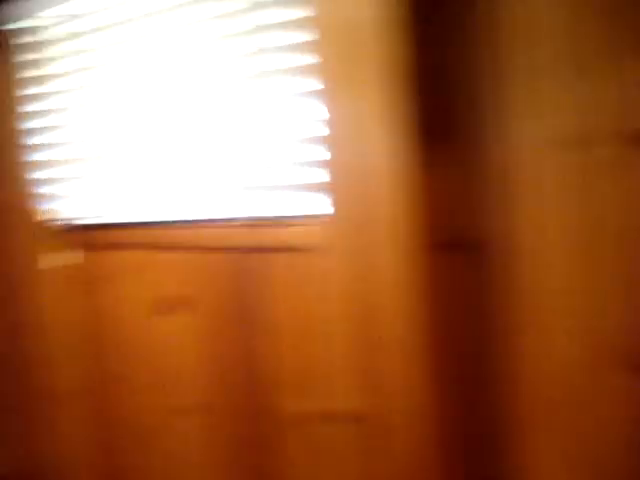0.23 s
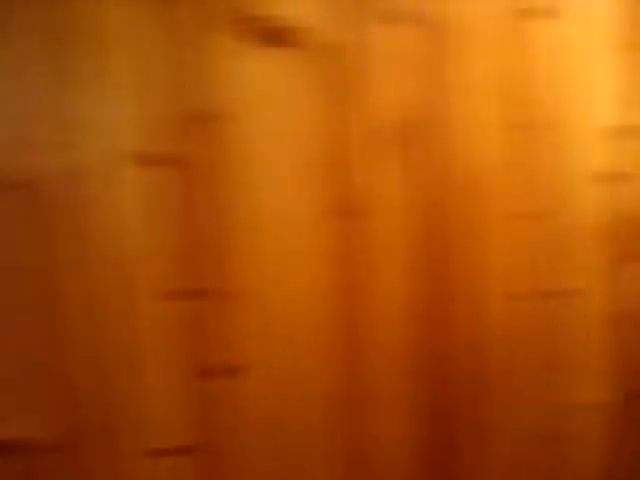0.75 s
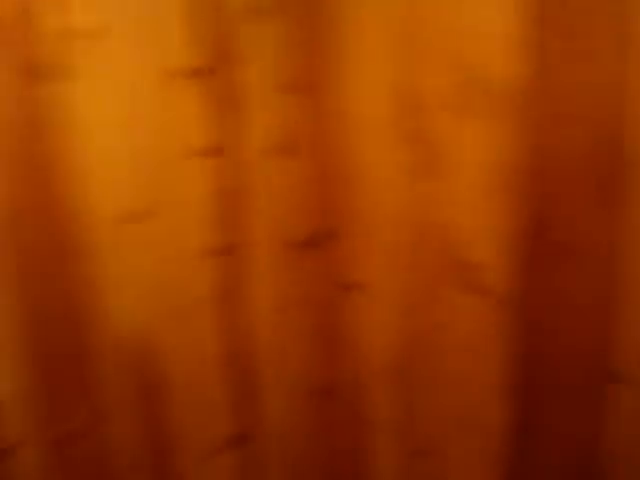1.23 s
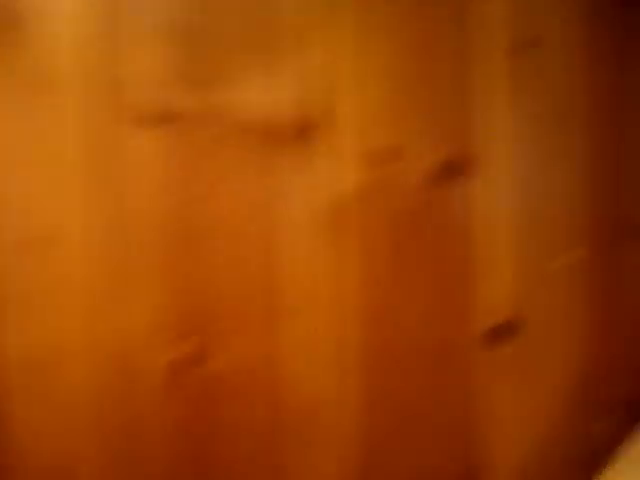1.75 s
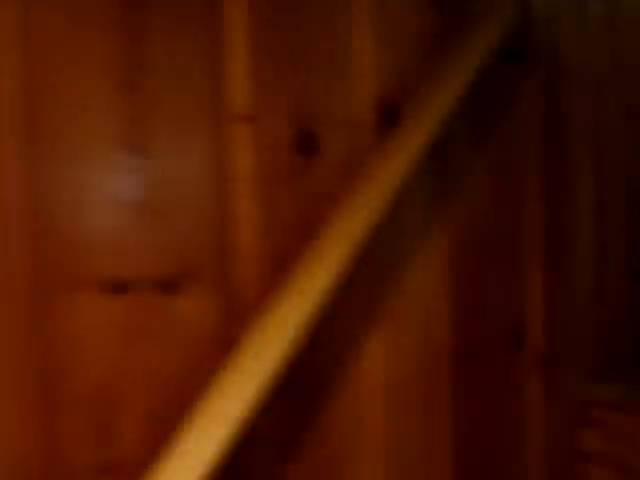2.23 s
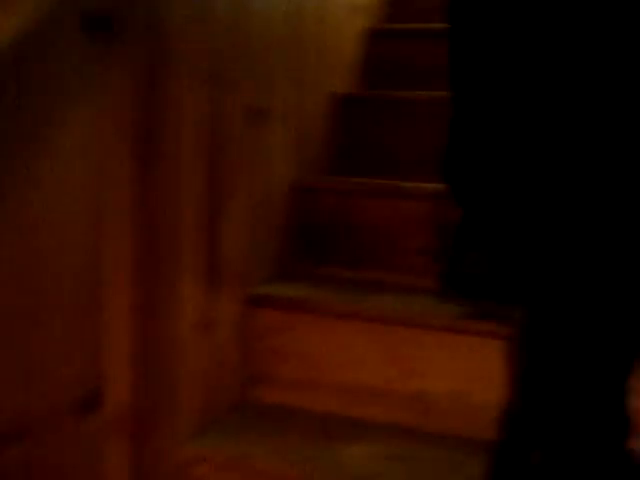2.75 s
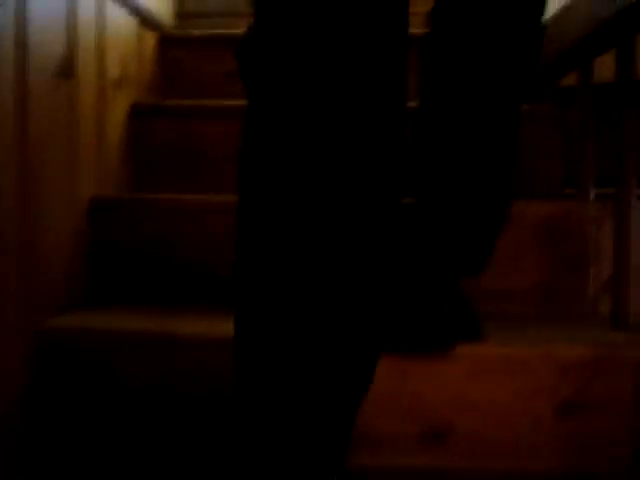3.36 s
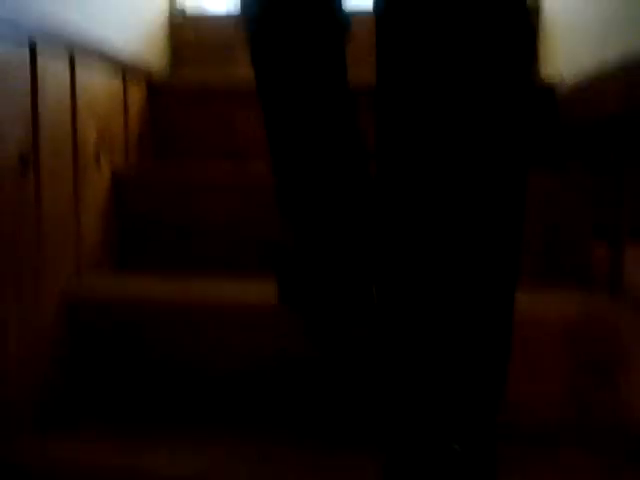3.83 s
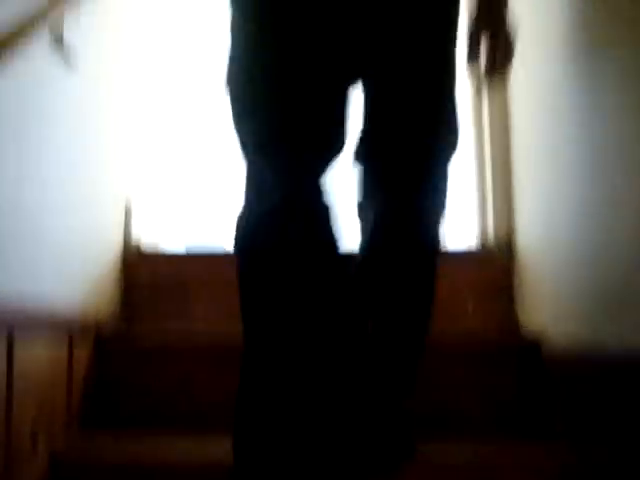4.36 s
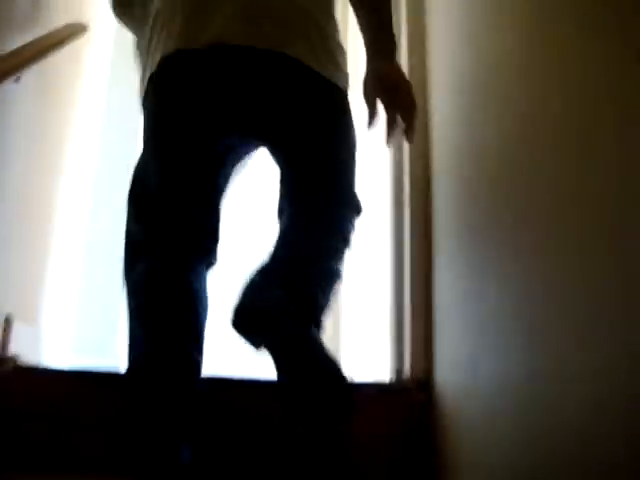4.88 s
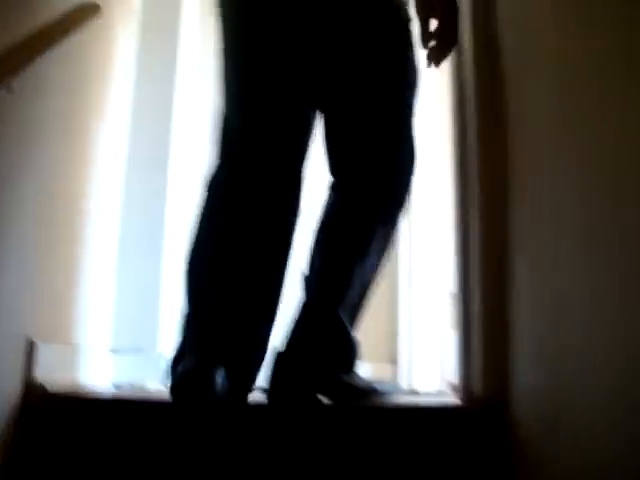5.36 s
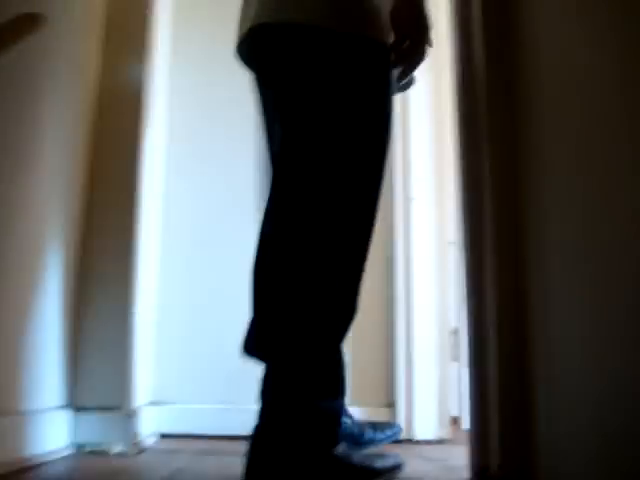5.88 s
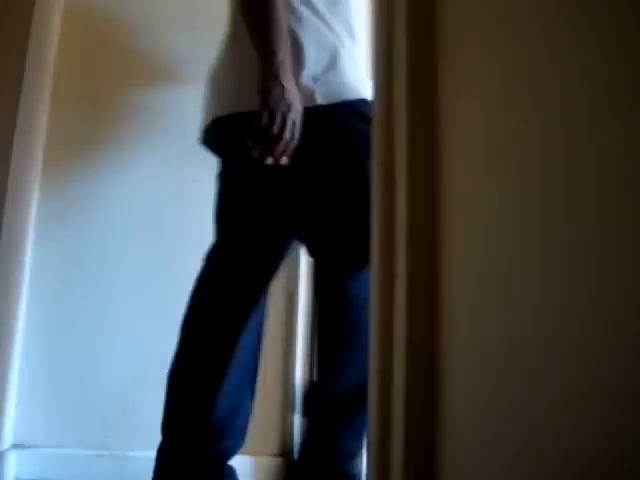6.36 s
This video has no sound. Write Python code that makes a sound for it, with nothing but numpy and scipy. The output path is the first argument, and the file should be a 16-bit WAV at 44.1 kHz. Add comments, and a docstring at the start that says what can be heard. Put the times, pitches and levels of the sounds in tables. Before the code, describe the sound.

In a quiet house, someone in hard shoes walks to a wooden staircase and goes up at about two steps a second, a few landing close together. The boards knock and ring briefly, and the bare walls echo. The microphone follows as the soles scrape grittily on the top landing, where a few lighter, more echoing steps move away.

```python
"""In a wood-panelled room, hard-soled shoes cross the floor and climb a wooden staircase.
The microphone follows behind. Each blow cracks on a board, rings it and shakes the stair frame,
and the bare walls answer with a dense echo. Boards knock again as the weight shifts, and the
soles scuff, most of all on the top landing. Under it all lies the faint noise of a quiet house."""
import sys
import numpy as np
from scipy import signal
from scipy.fft import rfft, irfft
from scipy.io import wavfile
from scipy.ndimage import uniform_filter1d

SR = 44100
rng = np.random.default_rng(int(sys.argv[2]) if len(sys.argv) > 2 else 0)


def bounce(signal):
    """Save signal as a 16-bit WAV file at the path given by the first command-line argument."""
    frames = np.transpose(np.atleast_2d(signal))
    limited = np.clip(frames, -1, 1)
    pcm = np.round(limited * 32767).astype(np.int16)
    wavfile.write(sys.argv[1], SR, pcm)


N = 291426

# The steps. Each row: start in seconds, strength in dB, weight on the stair frame in dB,
# hardness in dB (plus on the heel's edge, minus when flat), board pitch in Hz, heel pitch in Hz.
STEPS = [(0.1295, -11.5, -25, -1.5, 689, 1654), (0.7457, -11.5, -27, 1, 710, 1237),
         (1.3072, -12, -26, -1.5, 735.4, 860), (1.8172, -12, -21, 0.5, 619.6, 895),
         (2.164, -13.5, -25.5, -3, 470, 1360), (2.5263, -14, -33.5, 1, 804, 1304),
         (2.8138, -16.8, -20, -1.5, 677, 967), (2.9495, -10.5, -30.5, 0.5, 737, 1310),
         (3.3522, -18, -51.5, -1.5, 828, 1510), (3.4308, -12, -30, 3.5, 626, 1193),
         (3.9501, -11.5, -25, -2.5, 528.7, 1106), (4.413, -11.5, -32.5, 3.5, 762, 1297),
         (4.8074, -12.5, -30, 0, 735.5, 975), (5.2522, -17, -38, 2.5, 735, 1490),
         (5.7555, -27.5, -26, -5.5, 469, 1064), (6.0029, -22, -25, -1.5, 657, 894),
         (6.4398, -16, -23.5, -4.5, 525, 1031)]
# Toe taps and boards taking weight. Each row: start in seconds, strength in dB, hardness in dB.
TAPS = [(.584, -43.5, -11.5), (0.63, -35, -5), (.950, -23.5, -3.5), (1.348, -23.5, -1), (1.374, -27.5, -4),
        (1.465, -26, -1), (1.754, -30.5, -6), (1.985, -28.5, 0), (2.110, -26.5, -3.5), (2.122, -30, -2.5),
        (2.505, -28, -7), (3.520, -31, -13.5), (3.622, -24, -2), (4.158, -24, -5), (4.289, -31, -0.5),
        (4.695, -37, 6), (4.743, -24, 1), (5.659, -34, 0), (5.791, -30.5, -2.5), (5.861, -32.5, -6.5),
        (6.084, -30, -4.5)]
# Soles sliding on wood. Each row: start in seconds, length in seconds, level in dB.
SCUFFS = [(1.937, 0.042, -33), (2.306, 0.059, -39), (4.76, 0.054, -30.5), (4.867, 0.17, -30),
          (5.15, 0.13, -28.5), (5.259, 0.059, -27), (5.353, 0.082, -28.5), (6.047, 0.14, -34.5),
          (6.536, 0.062, -32)]
# The tone of struck wood, a sliding sole and the house. Each row: frequency in Hz, gain in dB.
WOOD_TONE = [(30, -42), (60, -18.5), (120, -9.5), (190, -3.5), (400, 5), (750, 7), (1600, 5.5), (2500, -6),
             (4000, -11.5), (6000, -14.5), (10000, -28.5)]
RASP_TONE = [(60, -26), (200, -19.5), (450, -0.5), (1000, -1), (2200, -4.5), (3200, -8.5), (4300, -10),
             (6500, -19), (10000, -34.5)]
HOUSE_TONE = [(30, -20.5), (100, -13.5), (250, -2), (500, -3), (1000, -1), (2000, -6.5), (4000, -12),
              (6500, -16), (10000, -19.5)]
# The notes of a board and of the stair frame under it.
# Each row: multiple of its pitch, level in dB, t60 (the seconds it takes to fade by 60 dB).
BOARD_NOTES = [(0.801, -7.5, 0.2), (1, 0, 0.55), (1.421, -21, 0.42), (2.098, -6.5, 0.22),
               (3.299, -13, 0.24)]
FRAME_NOTES = [(0.657, -11.5, 0.17), (0.999, -6, 0.35), (1.327, -9, 0.4)]
# The five bands of a blow: thud, body, knock, crack, tick. Each row: low and high edge in Hz,
# gain in dB, clatter t60 in seconds, echo t60 in seconds, echo level in dB.
BLOW_BANDS = [(45, 317, -5, 0.38, 0.64, -2.5), (322, 812, -4.5, 0.24, 0.83, -2),
              (1000, 2115, -4, 0.13, 0.72, -6.5), (2110, 5730, -7, 0.11, 0.69, -8.5),
              (4750, 13000, -0.5, 0.12, 0.73, -8.5)]
# The heel's body, knock, crack and tick. A harder hit trades body for treble; a higher heel note
# brings out the knock. Each row: dB over the strength, dB per dB of hardness, dB per octave of pitch.
HEEL_CONTACT = [(-3.5, -0.87, -4.5), (0.54, 0.2, 3.5), (0.32, 0.67, -2.5), (-19.5, 0.76, -7.5)]
# The same rows and columns for the sole, which loses its crack when it lands flat.
SOLE_CONTACT = [(-3, -0.93, 0.0049), (-1.5, 0.18, 0.0073), (1.5, 0.94, 0.0072), (-15.5, 1.2, 0.006)]
# The echo weakens as the microphone closes in on the stairs and swells as the walker leaves
# across the landing. Each row: time in seconds, change of level in dB.
ECHO_CURVE = [(0.13, 2.5), (1.3, -.5), (2.6, 1.9), (3.3, -2.5), (4.0, 1.5), (4.9, -2), (6.4, 3.5)]
# Narrow bands in which the panelled room rings. Each row: centre in Hz, width in Hz, gain in dB.
PANEL_RINGS = [(432, 11, -3.5), (516, 5.2, -2), (623, 30, -12.5), (1727, 15, -4), (2670, 53, -18),
               (4170, 49, -9.5), (6800, 62, -14.5), (9300, 110, -8)]

LIGHT_RING_DB, LIGHT_ECHO_DB = -2.5, -1  # taps and soles ring and echo less than most heels
HEEL_MIDDLE_HZ = 1200  # heel octaves count from here
FRAME_HZ, FRAME_YIELDS_DB, FRAME_SAG_HZ_PER_DB = 368.1, -27.5, 24


def footfalls(sole_lag_s=0.046):
    """Each step hits the wood heel first, then sole; lighter knocks fall in between."""
    out = np.zeros(N)
    for s, strength_db, weight_db, hardness_db, board_hz, heel_hz in STEPS:
        ring_db = 1 - 0.68 * hardness_db  # a flat landing leaves the board freer to ring
        echo_db = np.interp(s, *np.transpose(ECHO_CURVE))
        heel = tread(HEEL_CONTACT, strength_db, weight_db, hardness_db,
                     board_hz, heel_hz, ring_db, echo_db)
        add(out, s, heel)
        # the sole lands weaker, lighter and duller
        sole = tread(SOLE_CONTACT, strength_db - 17, weight_db - 6.5, hardness_db - 5, board_hz, heel_hz)
        add(out, s + sole_lag_s, sole)
    for s, strength_db, hardness_db in TAPS:
        # a tap sounds the same board and shoe as the nearest step
        *_, board_hz, heel_hz = min(STEPS, key=lambda step: abs(step[0] - s))
        weight_db = strength_db - 13.5 - 1.5 * hardness_db  # flatter taps load the frame more
        add(out, s, tread(SOLE_CONTACT, strength_db, weight_db, hardness_db, board_hz, heel_hz))
    return out


def tread(contact, strength_db, weight_db, hardness_db, board_hz, heel_hz,
          ring_db=LIGHT_RING_DB, echo_db=LIGHT_ECHO_DB):
    """One touch of shoe on wood: weight sets the thud, hardness shapes the higher bands."""
    octaves = np.log2(heel_hz / HEEL_MIDDLE_HZ)
    upper_db = [strength_db + over_db + per_hardness * hardness_db + per_octave * octaves
                for over_db, per_hardness, per_octave in contact]
    # past a certain weight more of the staircase swings, so the frame rings lower
    frame_hz = FRAME_HZ - FRAME_SAG_HZ_PER_DB * max(weight_db - FRAME_YIELDS_DB, 0)
    return blow([weight_db] + upper_db, frame_hz, board_hz, heel_hz, ring_db, echo_db)


def blow(levels_db, frame_hz, board_hz, heel_hz, ring_db, echo_db,
         heel_db=-17, heel_t60=0.25, attack_s=0.019):
    """The wood answers a shoe: a sharp click, clattering planks, ringing notes, then the echo."""
    t = np.arange(SR) / SR
    # walker and microphone move, so every blow meets new reflections
    clatter = colour(grit(SR, spread_db=5.5), WOOD_TONE) * rise(t, 0.00043)
    echo = colour(grit(SR, spread_db=4.5), WOOD_TONE) * rise(t, 0.0041)
    board = undb(-14) * ring(t, [(board_hz * ratio, db, t60) for ratio, db, t60 in BOARD_NOTES])
    heel = ring(t, [(heel_hz, heel_db, heel_t60)])
    frame = undb(-8) * ring(t, [(frame_hz * ratio, db, t60) for ratio, db, t60 in FRAME_NOTES])
    frame *= rise(t, 0.0054)  # the heavy frame takes a moment to start swinging
    click = 4.6 * colour(signal.unit_impulse(SR), WOOD_TONE)
    direct = click + undb(ring_db) * (board + heel) + frame
    out = 0
    for db, (lo_hz, hi_hz, gain_db, clatter_t60, echo_t60, wall_db) in zip(levels_db, BLOW_BANDS):
        walls = undb(wall_db + echo_db) * echo * fade(t, echo_t60)
        part = band(direct + clatter * fade(t, clatter_t60) + walls, lo_hz, hi_hz)
        attack_level = np.std(part[:int(attack_s * SR)])  # each band is scaled by how loud it starts
        out = out + undb(db + gain_db) * part / attack_level
    return out


def scuffs(edge_s=0.018, room_t60=0.83, room_db=-2):
    """A sole catches and slips on the grain: a gritty rasp and a hiss, echoed by the stairwell."""
    out = np.zeros(N)
    for s, length_s, db in SCUFFS:
        t = np.arange(int(length_s * SR)) / SR
        grip = undb(2.5 * unit(uniform_filter1d(rng.standard_normal(len(t)), size=250)))
        soft_ends = np.clip(np.minimum(t, length_s - t) / edge_s, 0, 1)
        slips = grit(len(t), spread_db=8.0) * grip * soft_ends
        rasp = undb(db) * unit(colour(slips, RASP_TONE))
        hiss_db = -32 + 0.36 * db  # the hiss grows more slowly than the rasp
        hiss = undb(hiss_db) * unit(band(slips, 3440, 6600, order=1))
        add(out, s, rasp + hiss)
    t = np.arange(SR) / SR
    room = rng.standard_normal(SR) * fade(t, room_t60)
    walls = signal.fftconvolve(band(out, 60, 7100, order=1), room / np.linalg.norm(room))[:N]
    return undb(-0.5) * out + undb(room_db) * walls


def panelling(x):
    """The room favours a few narrow bands, which ring on after each blow."""
    return x + sum(undb(db) * band(x, hz - width_hz / 2, hz + width_hz / 2, order=1)
                   for hz, width_hz, db in PANEL_RINGS)


def house(level_db=-46.5):
    """Steady, faint room noise."""
    return undb(level_db) * unit(colour(rng.standard_normal(N), HOUSE_TONE))


def ring(t, notes):
    """Fading notes (Hz, dB, t60), each struck with a random strength and sign."""
    out = 0
    for hz, db, t60 in notes:
        strength = undb(db + 2 * rng.standard_normal()) * rng.choice([-1, 1])
        out = out + strength * np.sin(2 * np.pi * hz * t) * fade(t, t60)
    return out


def grit(count, spread_db):
    """Dense clicks of unequal size; a larger spread makes single ones stand out."""
    return unit(rng.standard_normal(count) * undb(spread_db * rng.standard_normal(count)))


def colour(x, points, size=2048):
    """Shape a sound's tone to follow a curve of (Hz, dB) points."""
    hz, db = np.transpose(points)
    grid_hz = np.maximum(np.arange(size // 2 + 1) * SR / size, 1)
    gain = undb(np.interp(np.log(grid_hz), np.log(hz), db))
    cepstrum = irfft(np.log(gain))
    # fold it onto its first half, so the filter never sounds before the hit
    cepstrum[1:size // 2] *= 2
    cepstrum[size // 2 + 1:] = 0
    response = irfft(np.exp(rfft(cepstrum)))
    return signal.fftconvolve(x, response)[:len(x)]


def band(x, lo_hz, hi_hz, order=3):
    """Keep what lies between two frequencies."""
    edges_hz = [lo_hz, min(hi_hz, SR / 2 - 1)]
    return signal.sosfilt(signal.butter(order, edges_hz, "band", fs=SR, output="sos"), x)


def rise(t, rise_s):
    """Grow from 0 towards 1, about two thirds of the way after rise_s."""
    return 1 - np.exp(-t / rise_s)


def fade(t, t60):
    """Die away, 60 dB down after t60 seconds."""
    return np.exp(-np.log(1000) * t / max(t60, 1e-3))


def undb(db):
    """Turn decibels into a gain."""
    return 10 ** (np.asarray(db) / 20)


def unit(x):
    """Scale to an average (rms) level of 1."""
    return x / np.sqrt(np.mean(x ** 2))


def add(track, s, sound):
    """Mix a sound in, starting at s seconds."""
    start = int(s * SR)
    track[start:start + len(sound)] += sound[:N - start]


def scene():
    """One channel: steps and scuffs in the panelled room, over the quiet house."""
    return (panelling(footfalls() + scuffs()) + house())[None]


def record(dry, top_hz=9950):
    """A small microphone rounds the loudest peaks; the highest treble is cut steeply."""
    rounded = np.tanh(dry)
    return signal.sosfilt(signal.ellip(12, .2, 60, top_hz, fs=SR, output="sos"), rounded)


dry = scene()
out = record(dry)
bounce(out)
```